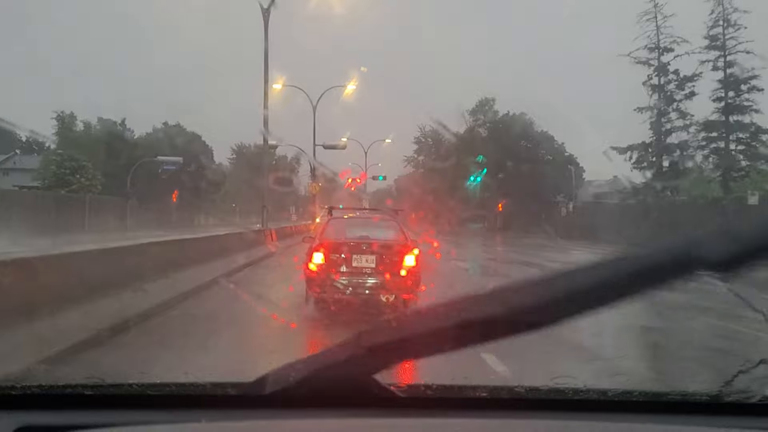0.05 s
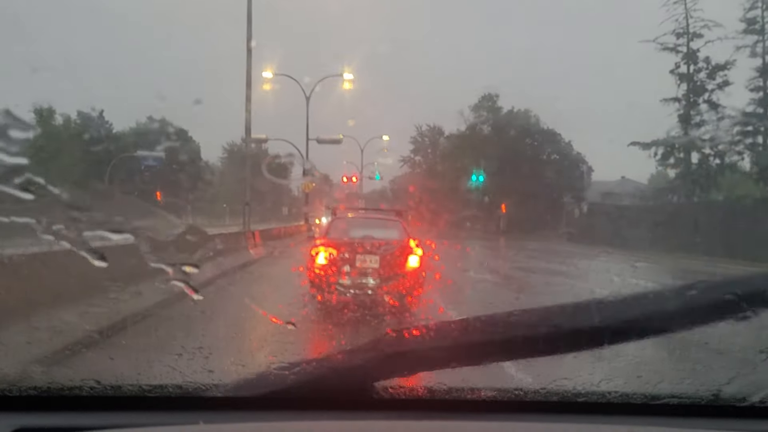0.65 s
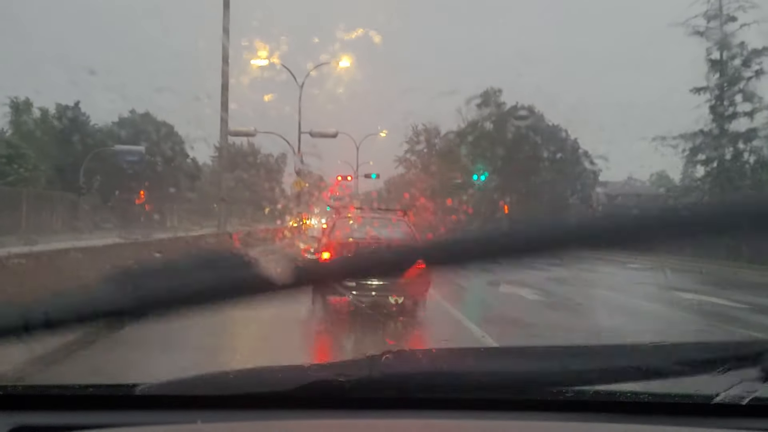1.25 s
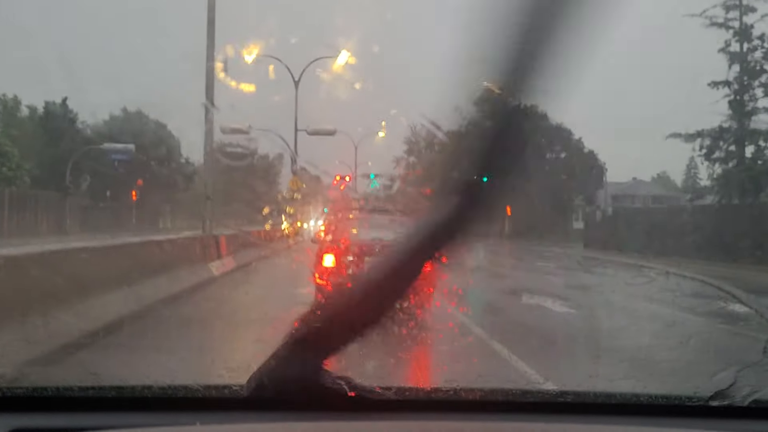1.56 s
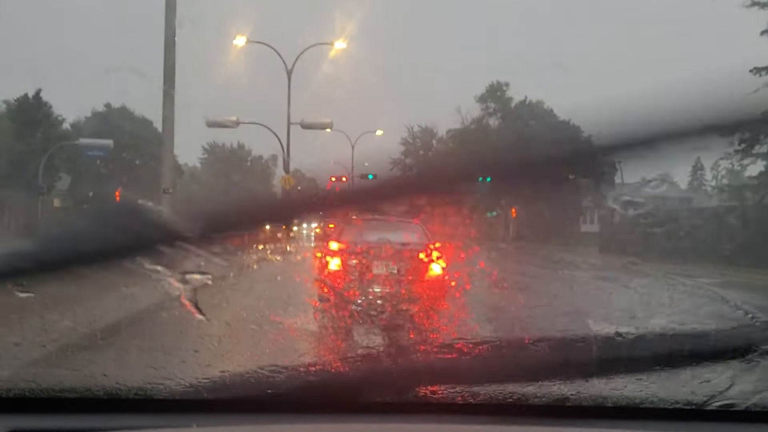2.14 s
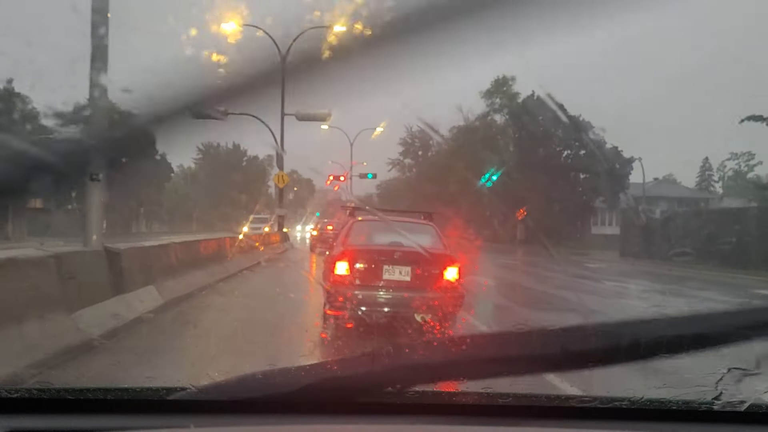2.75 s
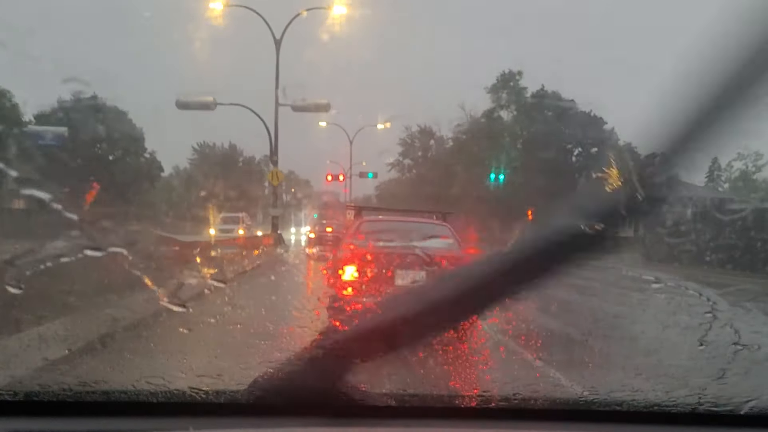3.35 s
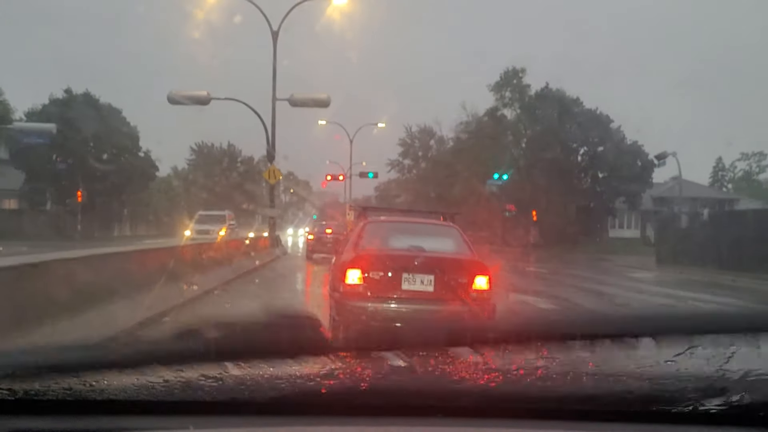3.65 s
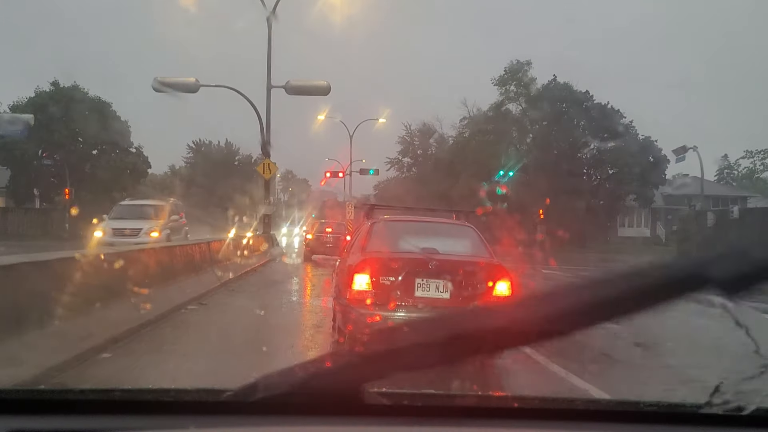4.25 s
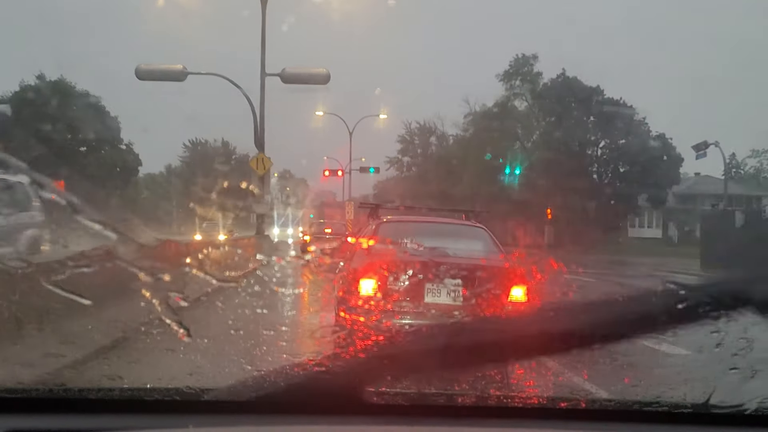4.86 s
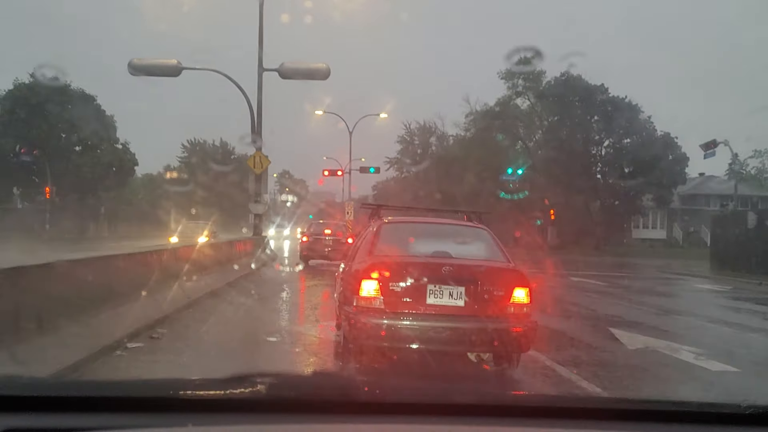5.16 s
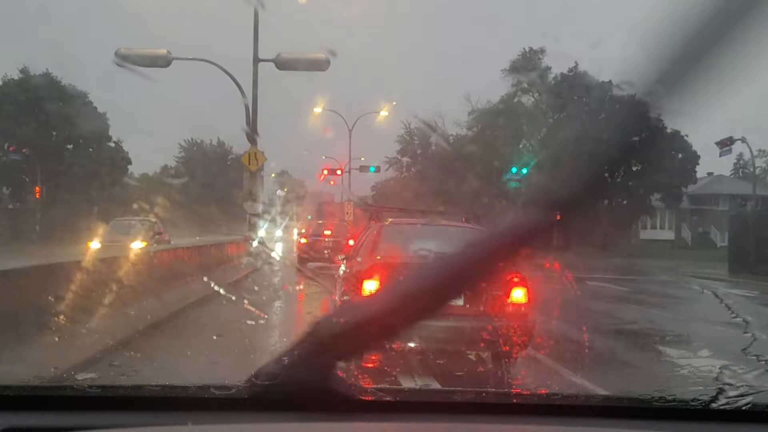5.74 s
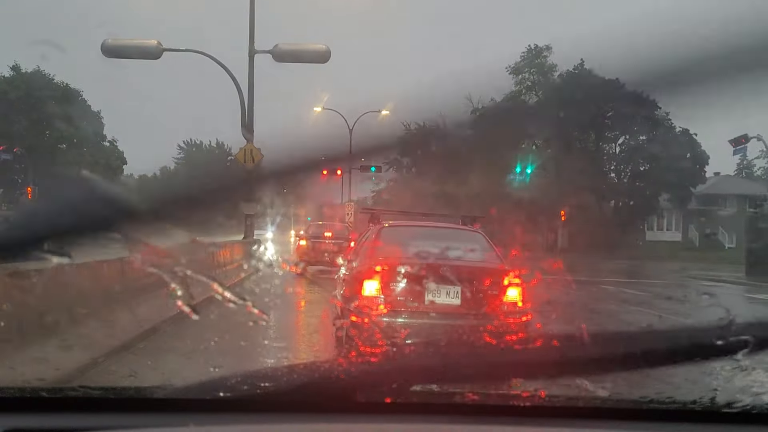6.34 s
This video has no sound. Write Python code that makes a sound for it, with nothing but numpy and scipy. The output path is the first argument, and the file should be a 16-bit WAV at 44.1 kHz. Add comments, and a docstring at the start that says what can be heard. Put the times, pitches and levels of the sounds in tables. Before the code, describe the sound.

Heavy rain on a slowly moving car is heard from inside for about six and a half seconds. Throughout, countless drops drum dully on the roof, and water hisses and patters on the windshield. Fat drops knock on a panel close on the right, thickly until about 3.5 seconds, then sparsely, picking up again from 5.5 seconds. Sharp ticks dot the glass, mostly in the first four seconds. The hiss dips briefly around 4 seconds and comes back. The wipers give soft, low bumps as they turn, clearest near 1.2, 1.7, 4, 5.5 and 6 seconds. Underneath, a deep cabin boom, body rumble and tyre drone swell briefly at bumps in the road, around 0.6, 1.1 to 1.7, 2.6, 4 and 5.4 seconds. This low end fades gradually as the car slows, while the roof drumming eases only a little.

```python
"""Heavy rain on a slowly moving car, heard from inside.
Drops drum on the ringing roof, fat ones thud on a panel close on the right, and water hisses and
ticks on the windshield. The wipers bump softly through their linkage as they turn. Underneath, the
cabin air booms over the wet road, while body rumble and tyre drone lift at bumps and fade with speed."""
import sys
import numpy as np
from scipy import signal
from scipy.fft import rfft, irfft, next_fast_len
from scipy.io import wavfile

SR = 44100
rng = np.random.default_rng(int(sys.argv[2]) if len(sys.argv) > 2 else 0)


def waveform_to_disk(signal):
    """Save audio, clipped to [-1, 1], as 16-bit WAV at the path in sys.argv[1]."""
    frames = np.transpose(np.atleast_2d(signal))
    scaled = np.clip(frames, -1, 1) * 32767
    samples = np.round(scaled).astype(np.int16)
    wavfile.write(sys.argv[1], SR, samples)


N = 291060
TIME = np.arange(N) / SR


# ring of the roof: (frequency [Hz], bandwidth [Hz], gain [dB])
ROOF_MODES = [(234.5, 31.7, 0.5), (273.7, 28, 0), (334.6, 38.5, -4), (415, 77, -9), (574.5, 48, -12.5),
              (753, 170, -15.5), (1270, 83, -29)]
def roof_drumming(start_db=-36.5, fade_db_per_s=-0.44):
    """Countless drops drum on the lined roof, each patch ringing in its own mode; the drumming fades slowly as
    the car slows."""
    shared = drops(per_s=300, spread_db=2.4, scatter_db=11)
    drum = 0
    for mode in ROOF_MODES:
        patch = drops(per_s=290, spread_db=3.0, scatter_db=8.5) * rng.choice([-1, 1], N)
        drum = drum + resonate(0.45 * shared + patch, [mode])
    return butter(from_db(start_db + fade_db_per_s * TIME) * rms_one(drum) * pan(-2.5), 1120)


# ring of the near panel: (frequency [Hz], bandwidth [Hz], gain [dB])
PANEL_MODES = [(138, 67, -14), (261, 63, 14), (430, 100, 11), (612, 35, -20), (770, 39, -2.5)]
# accent hits on that panel: (time [s], relative level [dB])
PANEL_HITS = [(0.027, -26), (0.286, -21), (0.333, -21.5), (0.356, -22), (0.403, -25), (0.504, -26),
              (0.65, -26.5), (0.891, -21.5), (0.912, -24.5), (0.934, -25), (0.985, -27.5), (1.078, -23),
              (1.43, -28), (1.442, -26), (1.471, -23.5), (1.513, -23), (1.678, -21.5), (1.799, -24),
              (1.817, -25), (1.916, -23), (2.012, -25.5), (2.056, -23), (2.133, -25), (2.223, -22.5),
              (2.364, -20.5), (2.409, -26), (2.555, -19.5), (2.714, -25.5), (3.042, -24), (3.129, -23),
              (3.262, -24.5), (3.34, -26), (3.43, -26), (3.865, -27), (5.475, -21.5), (5.517, -27),
              (5.588, -27), (5.785, -26.5), (5.919, -29), (6.04, -28), (6.236, -23.5), (6.487, -24.5)]
def fat_drops():
    """A round knock on the well-damped panel, with a faint wet snap; the cabin returns dull echoes."""
    hits = from_db(-34.5) * drops(per_s=11, spread_db=-1.5, scatter_db=2.5)[0]   # lesser drops as fill
    for s, db in PANEL_HITS:
        hits[int(s * SR)] = from_db(db)
    push = butter(signal.unit_impulse(SR), 1020, order=4)   # a soft drop presses for about 0.5 ms
    knock = resonate(push, PANEL_MODES)
    thud = from_db(2.5) * signal.fftconvolve(hits, knock / np.abs(knock).max())[:N]
    echoes = np.zeros((2, SR // 10))
    for side in echoes:
        lags_s = rng.uniform(0.00325, 0.025, size=12)
        side[(lags_s * SR).astype(int)] = rng.choice([-1, 1], size=12) * np.exp(-lags_s / 0.0078)
    cabin = signal.fftconvolve(butter(thud, 1300)[None], echoes, axes=1)[:, :N]
    snap = butter(colour(splash(hits, decay_s=0.0019), WET_GLASS_EQ), 7700)
    return (thud + from_db(-8) * snap) * pan(-26) + from_db(-9.5) * cabin


# fader ride of the rain reaching the glass: (time [s], level [dB])
GLASS_RIDE = [(0.05, -47), (1.39, -47.5), (1.64, -44.5), (1.77, -47.5), (2.01, -43), (2.04, -46),
              (2.91, -46.5), (3.51, -44), (3.53, -46.5), (3.89, -54), (4.12, -53.5), (4.21, -47),
              (4.36, -44.5), (4.88, -50.5), (5.17, -46.5), (5.19, -49), (6.51, -47.5), (6.55, -48.5)]
# gusts flinging extra water on the glass: (time [s], lift [dB])
GUST_CUES = [(1.05, 3), (2.6, 1), (3.15, 0.5), (3.47, 0)]
def windshield_wash():
    """The wash of water on the glass and the fine spray above it swell and ease with the rain."""
    ride_db = in_time(GLASS_RIDE) + sum(db * swell(s, width_s=0.039) for s, db in GUST_CUES)
    swell_db = ride_db - ride_db.mean()
    wash = butter(wet_glass(), 5000, order=4)
    spray = rms_one(butter(wet_glass(), 5000, order=4, kind="high"))
    dull = butter(wash, 1000, order=1)
    # the dull part comes from all round the car and barely swells; the spray swells most
    wash = dull * from_db(0.063 * swell_db) + (wash - dull) * from_db(swell_db)
    spray = spray * from_db(1.26 * swell_db)
    return from_db(ride_db.mean()) * (from_db(2) * wash + from_db(-8.5) * spray)


# tone of water on glass: (frequency [Hz], gain [dB])
WET_GLASS_EQ = [(200, -11), (600, -1.5), (820, 2), (1080, -1.5), (1350, 1.5), (1750, -1.5), (2800, 0),
                (4000, -5), (5700, -11), (7200, -12), (8400, -21.5), (10000, -21.5), (12000, -19),
                (13500, -24.5)]
def wet_glass():
    """Spray hisses on the glass and single drops patter through it."""
    hiss = rms_one(colour(stereo_noise(side_db=1.0), WET_GLASS_EQ))
    hits = drops(per_s=320, spread_db=3.5, scatter_db=8.0)
    patter = rms_one(colour(splash(hits, decay_s=0.0095), WET_GLASS_EQ))
    return rms_one(hiss + from_db(-1.5) * patter)


# accent hits on the glass: (time [s], relative level [dB], leftward pan before widening [dB])
GLASS_HITS = [(0.025, -36, -1.5), (0.1288, -36, -3), (0.2538, -35, -4), (0.3436, -33.5, -3.5),
              (0.4943, -36, -2), (0.696, -38, -2), (0.914, -39, -5), (1.2573, -36, 0.0), (1.434, -34, -2),
              (1.61, -38, 0.5), (1.8074, -36.5, -0.5), (2.5563, -34, -3), (2.6308, -34.5, -1.0),
              (3.2405, -38, 3), (3.4538, -32, 6), (3.5028, -35, 8), (3.719, -40, -5), (4.6748, -40, 11)]
# tone of a tick on the glass: (frequency [Hz], gain [dB])
TICK_EQ = [(800, 10), (3000, 8), (7000, 5), (8600, -4), (12000, -2.5), (16000, -11)]
def hard_drops(trim_db=-2, widening=1.6):
    """Sharp ticks on the glass, each with a short tail of spray; fainter ones fall at random between."""
    hits = np.zeros((2, N))
    for s, db, left_db in GLASS_HITS:
        hits[:, int(s * SR)] = from_db(db + trim_db) * pan(widening * left_db)[:, 0]
    hits += from_db(-54) * drops(per_s=42, spread_db=3.0, scatter_db=14)
    crack = from_db(9.5) * hits + from_db(2) * splash(hits, decay_s=0.0006)
    tail = from_db(-7) * splash(hits, decay_s=0.005)
    tiny = drops(per_s=16, spread_db=4.0, scatter_db=8)
    sparkle = butter(tiny, 11000, order=4, kind="high")   # the smallest drops tick only in the top end
    return colour(crack + tail, TICK_EQ) + from_db(-44) * sparkle


# turns of the blades: (time [s], level [dB])
WIPER_CUES = [(.33, -34), (1.23, -30.5), (1.73, -32.5), (2.63, -35), (3.15, -40), (4.02, -31.5),
              (5.34, -35), (5.45, -30), (5.95, -31.5), (6.04, -34)]
# ring of the wiper linkage: (frequency [Hz], bandwidth [Hz], gain [dB])
LINKAGE_MODES = [(90.5, 24, 3.5), (122, 12, -4), (253.4, 53, 0.5), (510, 190, -18), (750, 11, -5.5)]
def wipers():
    """At each turn the blades flip over and shudder briefly through their linkage."""
    turning = sum(from_db(db) * swell(s, width_s=0.03) for s, db in WIPER_CUES)
    shudder = rms_one(resonate(stereo_noise(side_db=-8.5), LINKAGE_MODES))
    return butter(turning * shudder * pan(-1.5), 760)


# fader ride of the boom, how hard the road shakes the car: (time [s], relative level [dB])
BOOM_RIDE = [(0, -22.5), (1.5, -24), (3.4, -23), (3.75, -31.5), (5.15, -24), (5.7, -29), (6.6, -28.5)]
# bumps in the road: (time [s], boom lift [dB], rumble and drone lift [dB])
BUMP_CUES = [(.05, -0.5, 3), (.27, 2.5, 1.5), (.63, 8, 2), (1.11, 5.5, 1), (1.31, 6, 2.5), (1.46, 5.5, 5),
             (1.70, 9, 0), (2.62, 5, 4.5), (3.27, 1.5, 2), (3.96, 5, 8), (5.37, 2.5, 11), (6.0, 0, 7.5)]
def road_bed(stop_s=8.3):
    """The low end falls as the car slows evenly toward rest at stop_s; bumps lift it for a moment."""
    speed_db = 20 * np.log10(np.maximum(1 - TIME / stop_s, 0.01))
    heave_db = sum(db * swell(s, width_s=0.045) for s, db, _ in BUMP_CUES)
    jolt_db = sum(db * swell(s, width_s=0.045) for s, _, db in BUMP_CUES)
    boom = from_db(1 + in_time(BOOM_RIDE) + heave_db) * cabin_boom()
    rumble = from_db(-27 + 0.74 * speed_db + jolt_db) * body_rumble()
    drone = from_db(-31.5 + 1.12 * speed_db + jolt_db) * tyre_drone()
    return boom + rumble + drone


def cabin_boom(hz=45.64, width_hz=15.6, compression=0.37):
    """The cabin air throbs unevenly at its lowest mode."""
    mode = [(hz, width_hz, 0)]
    throb = resonate(resonate(rng.standard_normal(N + SR), mode), mode)
    envelope = np.abs(signal.hilbert(throb))
    return rms_one(throb / envelope ** compression)[SR:] * pan(-3.4)   # 1 s of pre-roll to build up


# tone of the shaking body: (frequency [Hz], gain [dB])
BODY_EQ = [(15, -26), (25, 9), (36, -20), (58, 1.5), (80, 5), (106, -1), (130, -6.5), (165, -9), (200, -12),
           (300, -26), (700, -70)]
def body_rumble():
    """The road shakes the car body into a deep, broad rumble."""
    return rms_one(colour(stereo_noise(side_db=-7.5), BODY_EQ)) * pan(1.0)


# ring of the tyres: (frequency [Hz], bandwidth [Hz], gain [dB])
TYRE_MODES = [(122.9, 18.4, -1.5), (141.15, 21.6, 0.5)]
def tyre_drone():
    """The rolling tyres drone through the floor in narrow bands of noise."""
    drone = 0
    for hz, width_hz, db in TYRE_MODES:
        mode = [(hz, width_hz, 0)]
        drone = drone + from_db(db) * resonate(resonate(stereo_noise(side_db=-19), mode), mode)
    return rms_one(drone)


def drops(per_s, spread_db, scatter_db):
    """Random impacts: levels trail off from 0 dB on the scale of spread_db, pans scatter by scatter_db."""
    at = np.flatnonzero(rng.random(N) < per_s / SR)
    sizes = from_db(spread_db * np.minimum(rng.exponential(1, N), 4))
    places = rng.standard_normal(N)
    out = np.zeros((2, N))
    out[:, at] = sizes[at] * pan(scatter_db * places[at])
    return out


def splash(impacts, decay_s):
    """Each impact bursts into a puff of spray that dies away."""
    power = signal.lfilter([1], [1, -np.exp(-2 / (decay_s * SR))], impacts ** 2 + 1e-18)
    return np.sqrt(power) * rng.standard_normal((2, N))


def stereo_noise(side_db):
    """Mid/side white noise; side_db sets the width."""
    mid, side = rng.standard_normal((2, N))
    return mid + from_db(side_db) * side * np.array([[1], [-1]])


def resonate(x, modes):
    """A bank of parallel resonators."""
    out = 0
    for hz, width_hz, db in modes:
        r = np.exp(-np.pi * width_hz / SR)
        ring = signal.lfilter([1, 0, -1], [1, -2 * r * np.cos(2 * np.pi * hz / SR), r * r], x + 1e-18)
        out = out + from_db(db) * (1 - r * r) / 2 * ring
    return out


def colour(x, eq):
    """Minimum-phase EQ, so that nothing rings ahead of a hit."""
    size = 2 * next_fast_len(N // 2 + SR // 2)
    hz, db = np.transpose(eq)
    bins_hz = np.maximum(np.arange(size // 2 + 1) * SR / size, 1)
    gains = from_db(np.interp(np.log(bins_hz), np.log(hz), db))
    cepstrum = irfft(np.log(gains))
    cepstrum[1:size // 2] *= 2
    cepstrum[size // 2 + 1:] = 0
    return irfft(rfft(x, size) * np.exp(rfft(cepstrum)))[..., :N]


def butter(x, hz, order=2, kind="low"):
    """Low-pass or high-pass with a flat passband."""
    return signal.sosfilt(signal.butter(order, hz, kind, fs=SR, output="sos"), x + 1e-18)


def swell(s, width_s):
    """A bell-shaped swell of height 1 around time s."""
    return np.exp(-0.5 * ((TIME - s) / width_s) ** 2)


def in_time(ride):
    """A fader ride, read at every sample."""
    return np.interp(TIME, *np.transpose(ride))


def pan(left_db):
    """Left and right gains, left_db apart, whose mean is 1."""
    gains = from_db(np.array([[0.5], [-0.5]]) * left_db)
    return gains / gains.mean(axis=0)


def rms_one(x):
    """Scale so that the mean of the channels has rms 1."""
    return x / np.sqrt(np.mean(np.atleast_2d(x).mean(axis=0) ** 2) + 1e-20)


def from_db(db):
    """Decibels to gain."""
    return 10 ** (np.asarray(db) / 20)


def scene():
    """The mix from inside the car: road below, rain above, wet glass and wipers ahead."""
    below = road_bed()
    above = roof_drumming() + fat_drops()
    ahead = windshield_wash() + hard_drops() + wipers()
    return below + above + ahead


def record(dry):
    """A steep high cut at 15.8 kHz on the master."""
    return signal.sosfilt(signal.ellip(12, 0.1, 80, 15800, fs=SR, output="sos"), dry)


dry = scene()
out = record(dry)
waveform_to_disk(out)
```